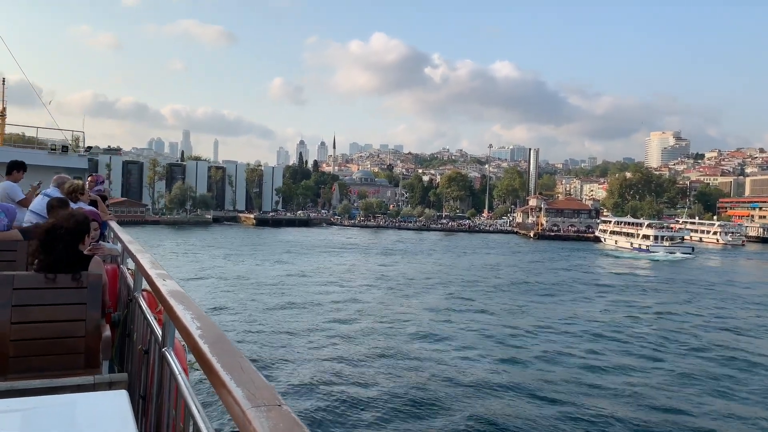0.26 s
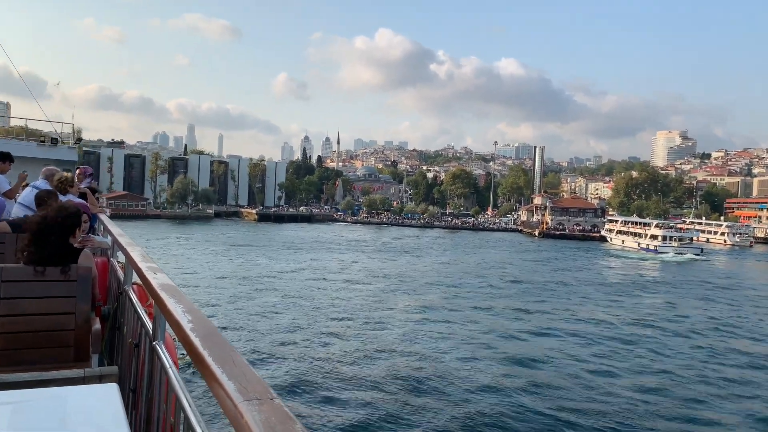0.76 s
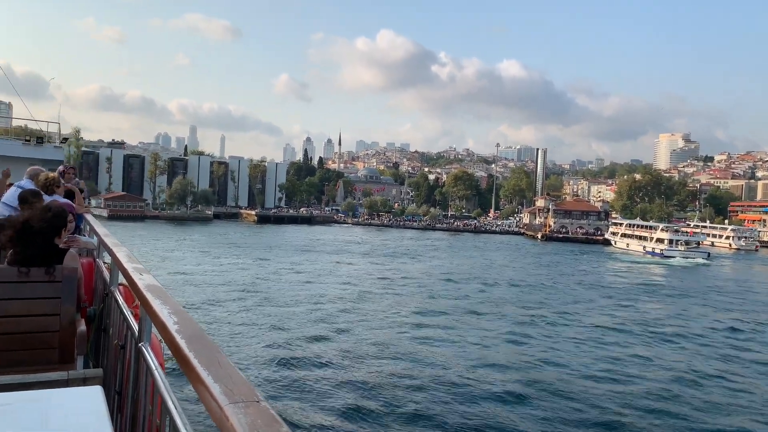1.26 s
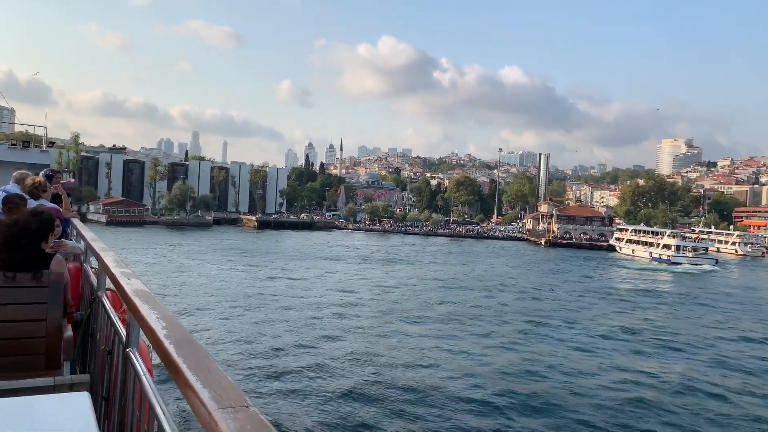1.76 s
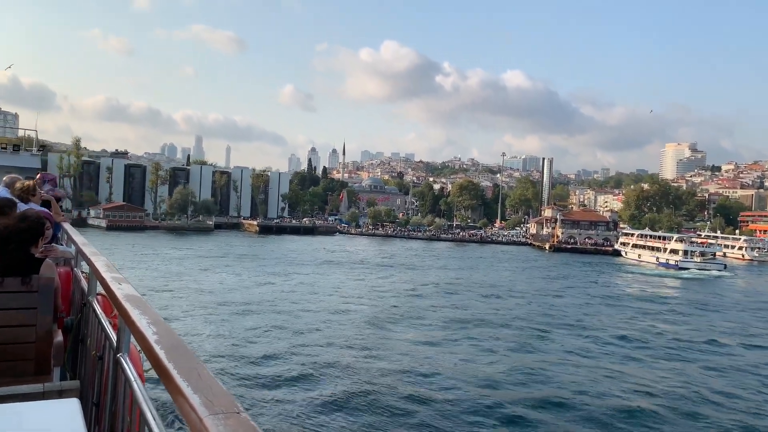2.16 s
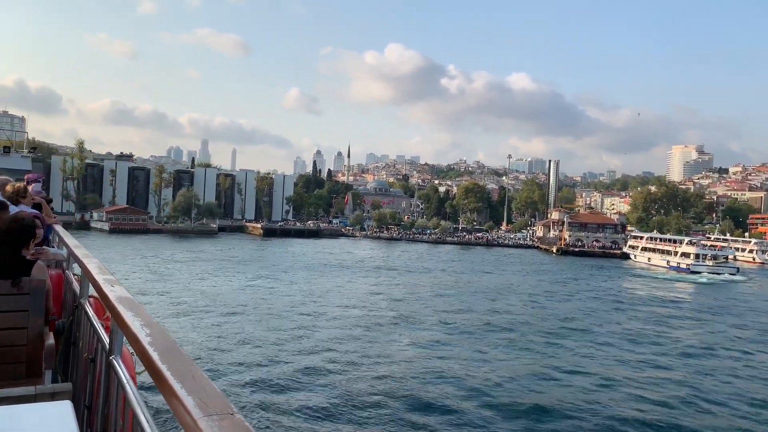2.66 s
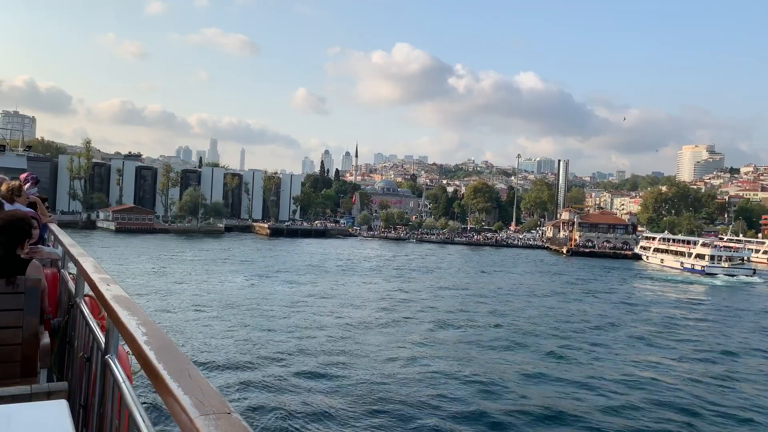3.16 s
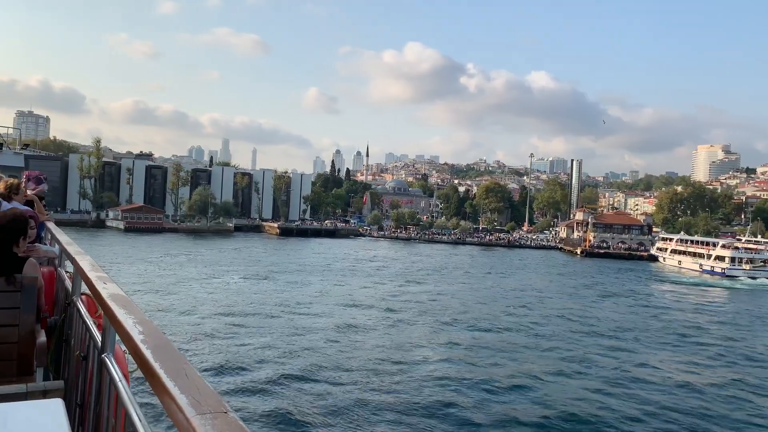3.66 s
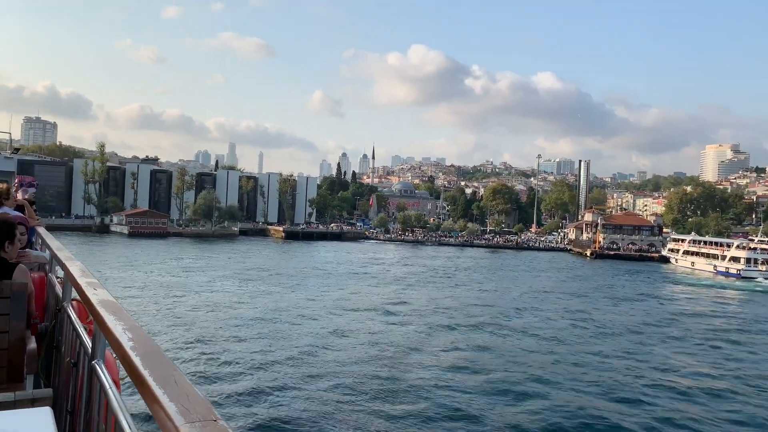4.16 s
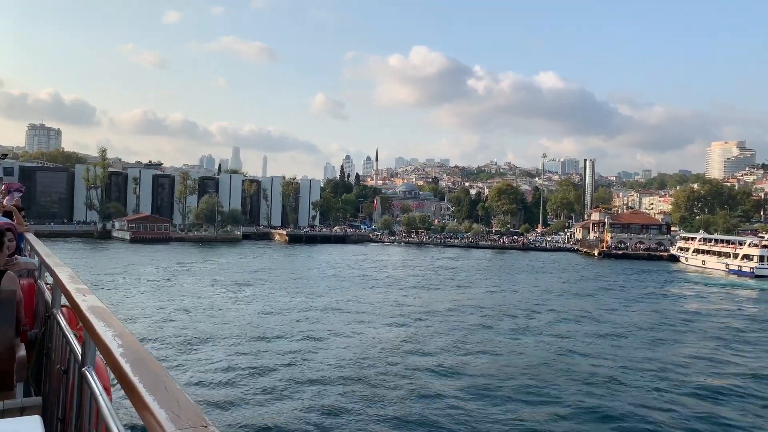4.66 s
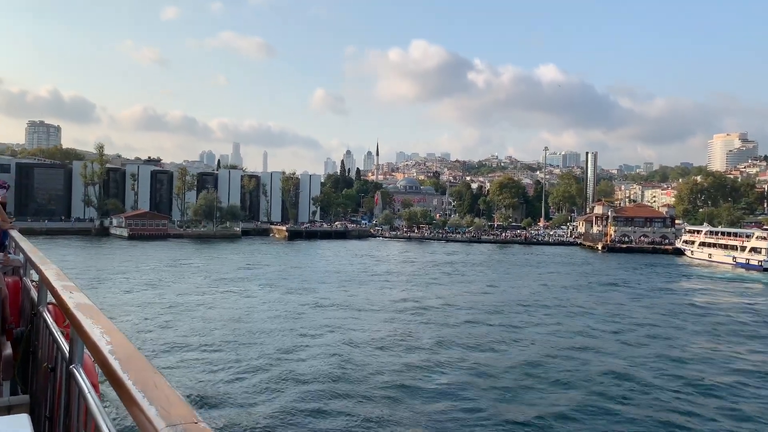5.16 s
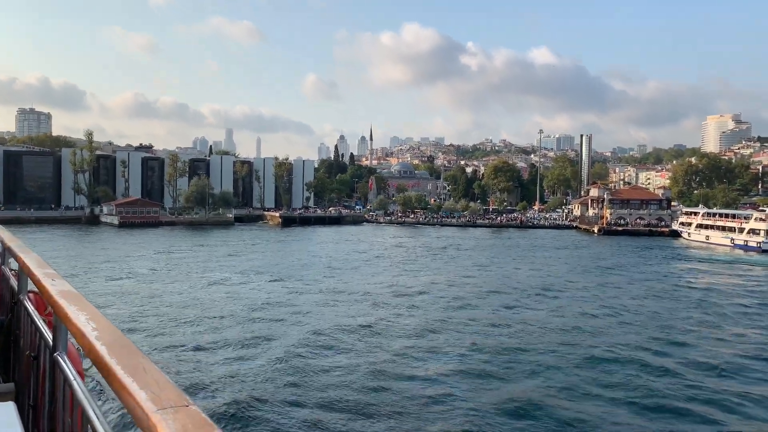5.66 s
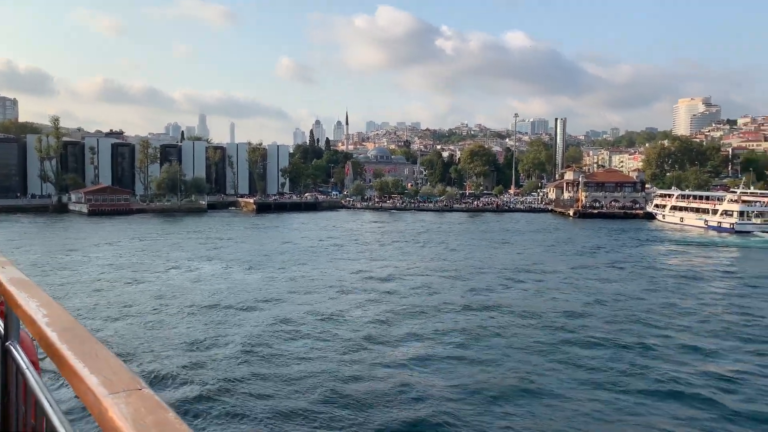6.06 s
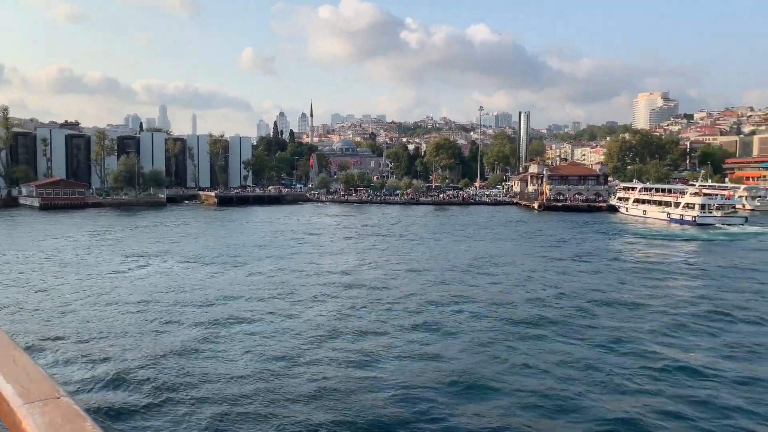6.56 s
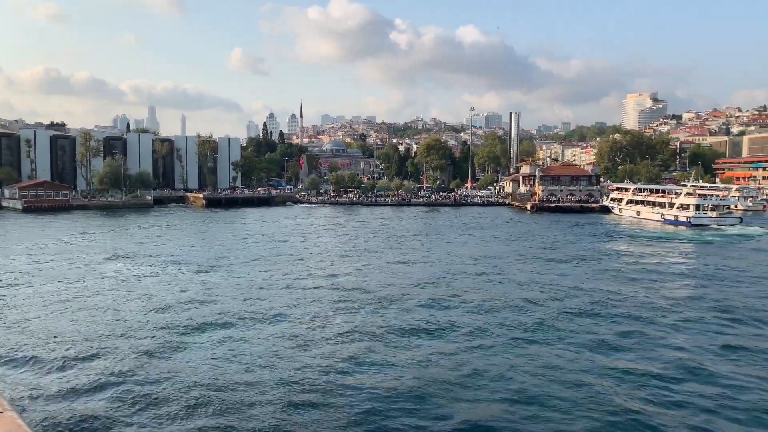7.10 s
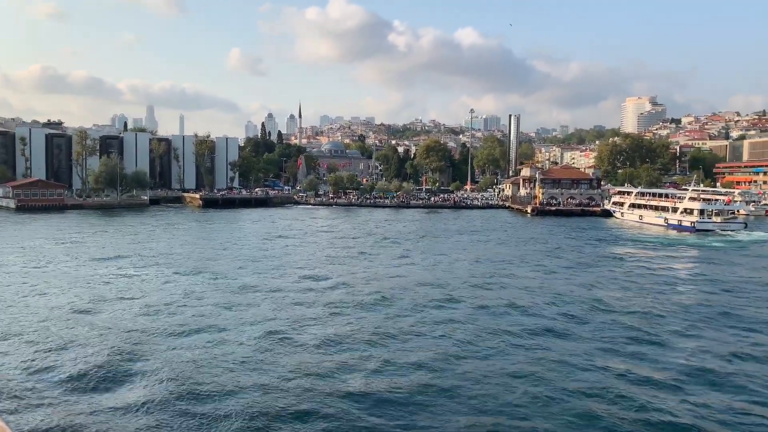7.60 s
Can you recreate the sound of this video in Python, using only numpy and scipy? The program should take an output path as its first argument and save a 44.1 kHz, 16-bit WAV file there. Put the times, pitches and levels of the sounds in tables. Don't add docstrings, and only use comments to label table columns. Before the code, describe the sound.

On the open deck of a moving ferry, wind slams a bare phone microphone, thudding, rasping and clipping hardest in the first second, then easing into uneven gusts. A low engine hum stays underneath, with very faint fan tones and foam hissing along the hull. Tiny dry digital ticks recur throughout, and a faint metal squeak comes near the end.

```python
import sys
import numpy as np
from scipy import signal
from scipy.fft import rfft, irfft, next_fast_len
from scipy.io import wavfile
from scipy.ndimage import uniform_filter1d

SR = 44100
rng = np.random.default_rng(int(sys.argv[2]) if len(sys.argv) > 2 else 0)


def unload_wav(signal):
    wavfile.write(
        sys.argv[1],
        SR,
        np.round(np.clip(np.atleast_2d(signal).T, -1, 1) * 32767).astype(np.int16),
    )


def decibels_to_gain(level_db):
    exponent = np.asarray(level_db, float) / 20
    return 10 ** exponent


N = 345402
STEP = 8


def on_log(hz, points_hz, values):
    return np.interp(np.log(hz), np.log(points_hz), values)


def between(hz, points_hz, rows):
    weights = np.eye(len(rows))
    return sum(on_log(hz, points_hz, w) * row for w, row in zip(weights, rows))


def curves(table):
    s, *columns = np.transpose(table)
    return [np.interp(np.arange(N) / SR, s, c) for c in columns]


def swells(table):
    t = np.arange(N) / SR
    return sum(db * np.exp(-((t - s) / length) ** 2) for s, db, length in table)


def walk(rate):
    hold = int(SR / rate)
    x = np.repeat(rng.standard_normal(N // hold + 1), hold)
    x = uniform_filter1d(uniform_filter1d(x, hold), hold)[:N]
    return x / np.std(x)


def noise(shape, push=None):
    size = next_fast_len(N)
    hz = np.maximum(np.arange(size // 2 + 1) * SR / size, 1)
    if push is None:
        push = rfft(rng.standard_normal(size))
    x = irfft(push * shape(hz), size)[:N]
    return x / np.std(x)


def tone(hz, db, wobble_hz, rate):
    phase = 2 * np.pi * np.cumsum(hz + wobble_hz * walk(rate)) / SR
    return np.sqrt(2) * decibels_to_gain(db) * np.sin(phase)


# (time [s], level [dB])
GUST = [(0, -14.5), (.3, -15.5), (.7, -18), (1.0, -21), (1.4, -22.5), (1.85, -22.5), (2.1, -20), (2.6, -23),
        (2.9, -20.5), (3.3, -22), (3.8, -25.5), (4.5, -29.5), (5.1, -25.5), (5.5, -22), (6.15, -22.5),
        (6.7, -22), (7.2, -25), (7.83, -21)]
# (time [s], lift [dB], length [s])
PUFFS = [(.1, 1.5, 0.091), (.39, -6.5, 0.023), (.7, 3, 0.056), (.87, -2, 0.08), (1.7, 6, 0.032),
         (2.03, 5, 0.055), (2.34, -2, .05), (2.46, 6.5, 0.11), (3.4, -3, 0.18), (3.66, -1.5, 0.037),
         (4.25, -2, 0.05), (4.58, -2.5, 0.082), (4.75, 5.5, 0.016), (5.19, -7, 0.026), (5.3, -2, .04),
         (5.66, -3.5, .05), (5.72, -4, 0.034), (5.79, 2.5, 0.033), (6.02, -7, 0.07), (6.28, -4.5, 0.048),
         (6.5, 1, 0.034), (6.83, -2.5, 0.054), (6.98, -3.5, 0.044), (7.24, -4.5, 0.021), (7.46, 3, 0.087)]


def air_speed():
    return curves(GUST)[0] + swells(PUFFS)


# (time [s], rasp
# level [dB], edge above rasp [dB])
CRACKS = [(0.0262, -12.5, -34), (0.1852, -16, -15), (.2867, -16.5, -7), (0.3108, -19, -16),
          (.3296, -18, -13.5), (0.3552, -21, -18), (0.4245, -16, -33), (.46, -25, -34),
          (0.5315, -13.5, -27), (.5437, -21, -3.5), (0.644, -21.5, -17), (0.6738, -17, -4.5),
          (0.6948, -11, -26), (1.1325, -24, -17), (1.9644, -26, -7), (2.012, -21, -23), (2.0247, -9, -12),
          (2.083, -21, -19), (2.1154, -23.5, -1), (2.161, -27, -18), (2.2202, -28, -9),
          (2.802, -22.5, -13.5), (2.8169, -23, -40), (2.907, -18, -4), (3.447, -23, -18),
          (3.519, -17.5, -17), (3.9194, -18.5, -22), (6.362, -22, -20), (6.8854, -20.5, -13.5),
          (7.8173, -23.5, -41),
          (.0746, -25, -14), (.0908, -30, -18), (.118, -31, -12), (.1393, -23, -27), (.6636, -29, 3),
          (1.3973, -28, -13), (1.4357, -28.5, -20), (1.6582, -30, -30), (1.7665, -38, -22), (2.154, -37, 0),
          (2.439, -27.5, 0.5), (2.4673, -24, -12), (2.8986, -30, -25), (3.1351, -32, -2),
          (3.7109, -33, -26), (3.7707, -27.5, -9), (3.8173, -32, -15), (4.1127, -26.5, -19),
          (4.154, -35, -10), (4.7578, -28, -11), (4.855, -26.5, -15), (5.5344, -24.5, -33),
          (5.564, -28, -17), (5.6151, -32, -30), (5.7717, -32, -15), (6.5798, -37, -26), (6.7912, -28, -11),
          (6.9021, -27.5, -8), (7.0196, -29, -24), (7.5837, -33, -25)]
# (time [s], body level [dB], rasp above body [dB])
THUMPS = [(0.1758, -12, -12), (.2518, -2.5, -30), (.5782, -21, -12), (0.9579, -6, -13),
          (1.0084, -10.5, -20), (1.1517, -17.5, -14), (1.2806, -20, -9), (1.3014, -14, -8),
          (2.0427, -12, -7.5), (2.4574, -7, -25), (3.2187, -18, -9), (3.5519, -11.5, -17),
          (3.6189, -13, -6.5), (3.699, -10.5, -15.5), (4.7835, -13, -14), (4.9339, -16, -18),
          (5.0173, -15.5, -27), (5.4121, -10.5, -21), (5.5222, -16.5, -17), (5.8121, -11.5, -12),
          (5.8481, -15.5, -17), (5.9467, -18.5, -15), (6.2113, -24, 0), (6.25, -22, -15),
          (6.4306, -14, -16), (6.4899, -9.5, -10), (6.5352, -10, -13), (6.7261, -17, -14),
          (7.4374, -15, -6.5), (7.7779, -13, -11)]
# (level above the row before, the first above the gust [dB], spread [dB])
PATTER = [
    (-9, 4.7),
    (-8.5, 5.3),
    (-25, 3.4),
]
PATTER_PER_S = 10
CRACK_BODY_DB, THUMP_EDGE_DB = 3, -16


def burst_rows(speed_db):
    count = int(PATTER_PER_S * N / SR)
    s = (np.arange(count)[:, None] + rng.random((count, 1)) * .98) / PATTER_PER_S
    step_db, spread_db = np.transpose(PATTER)
    steps_db = step_db + spread_db * rng.standard_normal((count, 3))
    patter = np.hstack([s, speed_db[(s * SR).astype(int)] + np.cumsum(steps_db, axis=1)])
    cracks = [(s, db + CRACK_BODY_DB, db, db + edge) for s, db, edge in CRACKS]
    thumps = [(s, db, db + rasp, db + rasp + THUMP_EDGE_DB) for s, db, rasp in THUMPS]
    return np.vstack([patter, cracks, thumps])


SNAPS_PER_S, SNAP_DB, SNAP_SPREAD_DB = 260, 14.0, 4.5


def turbulence(burst_s):
    bed = rng.standard_normal(N)
    when, size = rng.random(N), rng.exponential(size=N)
    snaps = (when < SNAPS_PER_S / SR) * np.sign(bed) * decibels_to_gain(SNAP_DB + SNAP_SPREAD_DB * size)
    scatter_s = np.array([.0003, .0022, .0035]) * rng.standard_normal((len(burst_s), 3))
    at = ((burst_s[:, None] + scatter_s) * SR).astype(int).clip(0, N - 1)
    snaps[at] = np.sign(bed[at]) * decibels_to_gain([27.0, 25.0, 24.0])
    return rfft(bed + snaps, next_fast_len(N))


BURST_HZ = (500, 1600, 4600)


def bursts(hz, s, rows_db):
    at = np.zeros(len(range(0, N, STEP)))
    at[(s * SR / STEP).astype(int)] = decibels_to_gain(between(hz, BURST_HZ, rows_db))
    t = np.arange(-125, 126) * STEP / SR / (.0015 + 1.3 / hz)
    return np.convolve(at, np.exp(-(t / 1.01) ** 2), "same")


GUST_HZ = (55, 280, 1200)
# (mean level [dB], share [dB per gust dB], own drift [dB])
FOLLOW = [
    (-22, .5, 0.5),
    (-23, 1, 1),
    (-39.5, 1.07, 0.35),
]
# (time [s], lift [dB], length [s])
THUDS = [(.02, 3.5, 0.092), (.3, -5, 0.1), (.44, 4.5, .06), (.74, -5, 0.098), (.83, 9.5, 0.031),
         (1.72, -6, 0.066), (2.0, -10, 0.043), (2.46, -0.5, 0.088), (2.7, -2.5, 0.061), (2.97, 1, 0.038),
         (3.58, 3.5, 0.096), (4.1, 4.5, .05), (4.24, -2, .07), (4.38, 8, .04), (4.6, -4, .04),
         (4.8, 5, .03), (4.84, 0, 0.016), (5.15, -2, 0.034), (5.24, 3, 0.043), (5.43, -7, 0.035),
         (5.78, 3, .04), (5.89, -7, 0.067), (6.1, 1, .05), (6.95, -6, 0.057), (6.5, 7, 0.017),
         (7.15, 5.5, 0.15), (7.76, -2, .03)]
# (frequency [Hz], half-octave level above the gust [dB])
EDDIES = [(25, -12), (60, -7.5), (150, -3.5), (300, -7.5), (600, -3.5), (1200, -6), (2400, -19),
          (5000, -33), (9000, -55)]
# (frequency [Hz], shared flicker [dB], own flicker rate [Hz])
FLUTTER = [(24.9, 4, 19), (118.5, 1, 35), (403.5, 3, 60), (1457, 5, 100), (6030, 8, 200)]
GUST_MEAN_DB, DRIFT_HZ = -22, 9


def wind():
    speed_db = air_speed()
    s, body_db, rasp_db, edge_db = burst_rows(speed_db).T
    burst_db = (body_db - 11, rasp_db - 12.5, edge_db - 14.0)
    push = turbulence(s)
    gust_db = []
    for mean_db, share, drift_db in FOLLOW:
        gust_db.append(mean_db + share * (speed_db - GUST_MEAN_DB) + drift_db * walk(DRIFT_HZ))
    gust_db[0] += swells(THUDS)
    gust_db = np.array(gust_db)[:, ::STEP]
    flicker = (0.25 * walk(60) + 0.93 * walk(170))[::STEP]
    eddy_hz, eddy_db = np.transpose(EDDIES)
    flutter_hz, shared_db, own_hz = np.transpose(FLUTTER)
    out = 0
    for hz in 24 * 2 ** np.arange(0, 9, .5):
        band = noise(lambda f: np.exp(-(np.log2(f / hz) / .42) ** 2), push)
        own_flicker_db = 1.7 * walk(on_log(hz, flutter_hz, own_hz))[::STEP]
        flicker_db = on_log(hz, flutter_hz, shared_db) * flicker + own_flicker_db
        steady = decibels_to_gain(between(hz, GUST_HZ, gust_db) + on_log(hz, eddy_hz, eddy_db) + flicker_db)
        reach_db = -6 * max(np.log2(300 / hz), 0) - 9 * max(np.log2(hz / 4600), 0)
        envelope = np.hypot(steady, decibels_to_gain(reach_db) * bursts(hz, s, burst_db))
        out = out + band * np.interp(np.arange(N), np.arange(0, N, STEP), envelope)
    return decibels_to_gain(-0.77) * out


def diesel():
    return tone(74.83, -27 + 0.39 * walk(3.0), 0.38, 5.97)


# (time [s], level [dB])
BLOWER = [
    (0.0, -60),
    (2.2, -61),
    (3.1, -58),
    (4.7, -59.5),
    (4.9, -69),
    (5.4, -69),
    (5.55, -60),
    (6.35, -61),
    (6.5, -72),
]


def blower():
    return tone(2497, curves(BLOWER)[0] + 1.4 * walk(18), 4.13, 25)


# (centre [Hz], width [Hz], level [dB])
FANS = [
    (2084, 65, -61.5),
    (3750, 360, -71.5),
    (2430, 380, -64.5),
]


def fans():
    out = 0
    for centre_hz, width_hz, db in FANS:
        mode = noise(lambda f: 1 / (1 + ((f - centre_hz) / width_hz * 2) ** 2))
        out = out + decibels_to_gain(db + 0.98 * walk(2.4)) * mode
    return out


# (frequency [Hz], density [dB per Hz])
WASH_COLOUR = [(300, 18.5), (1500, 20), (2600, 12), (3200, 8), (5100, -2.5), (9000, -1), (16000, 1)]
# (time [s], lift [dB], length [s])
WAVES = [(.0, 5.5, 0.46), (.83, 5.5, 0.25), (2.05, 4.5, 0.16), (2.4, 2.5, 0.18), (4.36, 3, .2),
         (5.3, 4.5, 0.27), (5.7, 1.5, 0.12), (6.25, 4, 0.45), (7.3, 3, 0.32), (2.9, -2, .25),
         (3.9, -1.5, 0.29), (6.9, -2, .12)]
WAVE_MEAN_DB = 3


def wash():
    hz, db = np.transpose(WASH_COLOUR)
    swell_db = swells(WAVES) - WAVE_MEAN_DB
    patches_hz = (3500, 7000, 11000, 15000)
    levels_db = (-53.0, -63.0, -63.5, -61.0)
    shares = (0.33, 1.4, 1.0, 1.2)
    out = 0
    for weights, level_db, share in zip(np.eye(4), levels_db, shares):
        band = noise(lambda f: decibels_to_gain(on_log(f, hz, db)) * (f > 200) * np.sqrt(on_log(f, patches_hz, weights)))
        out = out + band * decibels_to_gain(level_db + share * swell_db + 0.66 * walk(4.3))
    return out


# (time [s], notch depth [dB])
LOST = [(.2835, -6), (.4838, -16), (.7841, -15.5), (.8509, -15), (1.2847, -16.5), (1.5517, -12),
        (1.6185, -15), (2.0524, -14), (2.5529, -14.5), (2.6865, -13.5), (3.1871, -11.5), (3.4874, -12),
        (3.5542, -10), (3.6209, -10.5), (3.9209, -17.5), (4.3886, -18), (4.6889, -17), (4.7557, -17.5),
        (4.9559, -16.5), (5.3898, -14), (5.4566, -15), (5.8236, -16), (6.3242, -17), (6.391, -17),
        (6.4578, -13), (6.5913, -14), (6.8249, -16), (6.9584, -15.5), (7.459, -15), (7.726, -8)]
MIDDLING_S = [.15, 1.485, 1.8521, 1.9188, 2.4194, 2.6197, 2.9868, 3.0536, 3.1203, 4.1883, 4.3218, 4.8892,
              5.2563, 6.0239, 3.8212, 6.5245, 6.8916, 7.1586, 7.5257]
LOST_DB, LOST_SPREAD_DB, MIDDLING_DB = -30, 0.5, -21
SLOT_S, FIRST_SLOT_S = .0333768, .15
RUN_SLOTS, RUN_DROPS, SHORT_EVERY = 17, 6, 5


def lost_samples():
    drops = [RUN_DROPS - (run > 0 and run % SHORT_EVERY == 0) for run in range(14)]
    starts = np.cumsum([0] + [RUN_SLOTS - 2 * (RUN_DROPS - n) for n in drops])
    slots = np.concatenate([start + 2 * np.arange(n) for start, n in zip(starts, drops)])
    s = FIRST_SLOT_S + SLOT_S * slots
    depth_db = np.minimum(LOST_DB + LOST_SPREAD_DB * rng.standard_normal(len(s)), -24)
    depth_db[abs(s[:, None] - MIDDLING_S).min(axis=1) < SLOT_S / 2] = MIDDLING_DB
    deep_s, deep_db = np.transpose(LOST)
    keep = abs(s[:, None] - deep_s).min(axis=1) > SLOT_S / 2
    return np.append(s[keep], deep_s), np.append(depth_db[keep], deep_db)


# (time [s], frequency [Hz], level [dB])
WHINE = [
    (3.2, 9400, -86),
    (3.35, 9650, -75),
    (3.55, 10010, -73),
    (3.9, 10250, -71),
    (4.4, 10380, -74.5),
    (5.2, 10520, -75),
    (6.3, 10450, -77),
    (6.8, 10350, -80),
    (7.0, 10300, -92),
]


def gear_whine():
    hz, db = curves(WHINE)
    return tone(hz, db + 1.8 * walk(30), 40, 90)


# (time [s], frequency [Hz], level [dB])
SQUEAK = [
    (7.63, 5430, -95),
    (7.66, 5420, -70),
    (7.71, 5375, -65),
    (7.76, 5400, -72),
    (7.83, 5420, -74),
]


def squeak():
    return tone(*curves(SQUEAK), 8.4, 60)


def scene():
    return (wind() + diesel() + blower() + fans() + wash() + gear_whine() + squeak())[None]


def cut(x, hz, size):
    return signal.oaconvolve(x, signal.firwin(size, hz, window=("kaiser", 8.), fs=SR), "same")


def band_limit(x):
    return signal.sosfilt(signal.butter(12, 17000, fs=SR, output="sos"), x)


CLIP = .488
TOP_HZ, TICK_TOP_HZ, TICK_DB = 15800, 16350, -20.5


def record(dry):
    x = dry[0] / (1 + (dry[0] / CLIP) ** 12) ** (1 / 12)
    s, depth_db = lost_samples()
    at = np.round(s * SR).astype(int)
    notch = np.zeros(N)
    notch[at] = -np.sign(x[at]) * decibels_to_gain(depth_db)
    strong = notch * (abs(notch) > decibels_to_gain(TICK_DB))
    x = cut(x + notch - strong, TOP_HZ, size=1501) + cut(strong, TICK_TOP_HZ, size=201)
    return band_limit(x[None])


dry = scene()
out = record(dry)
unload_wav(out)
```